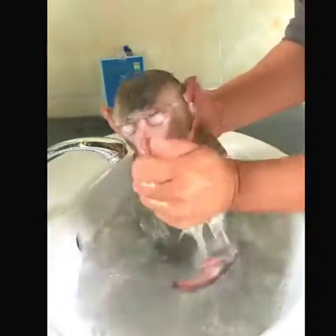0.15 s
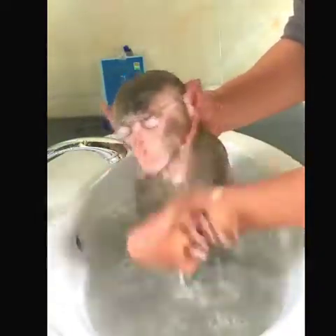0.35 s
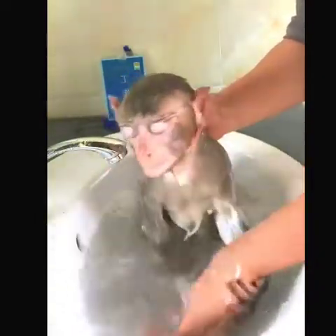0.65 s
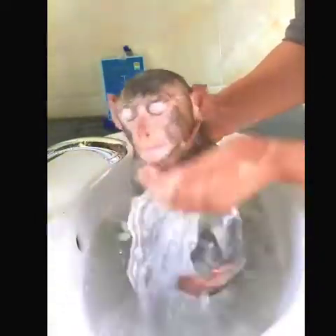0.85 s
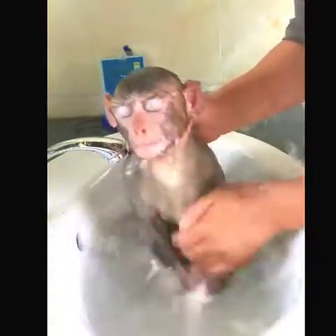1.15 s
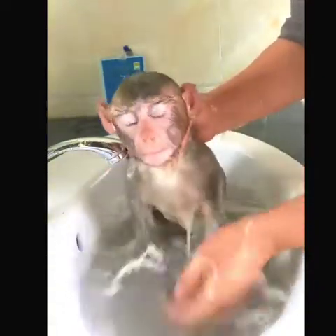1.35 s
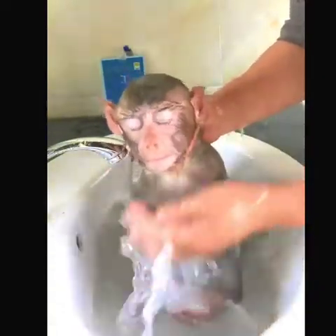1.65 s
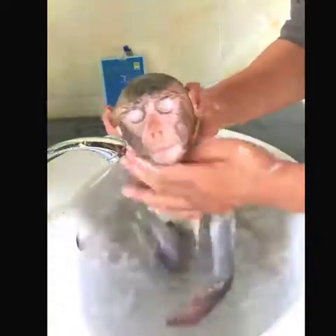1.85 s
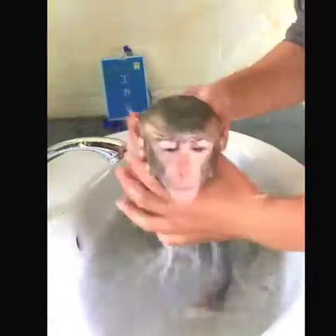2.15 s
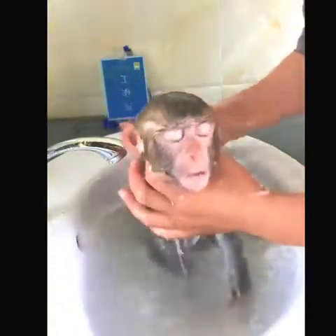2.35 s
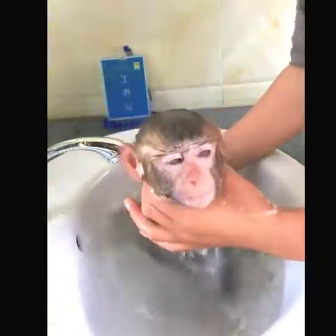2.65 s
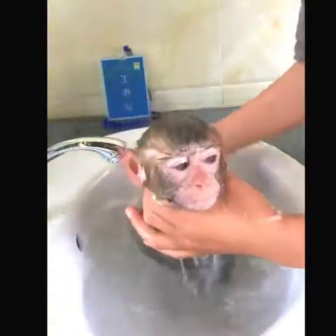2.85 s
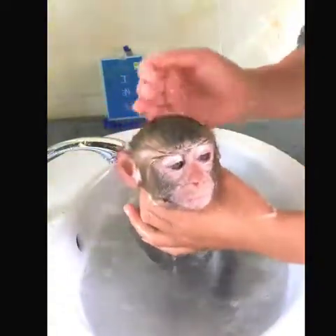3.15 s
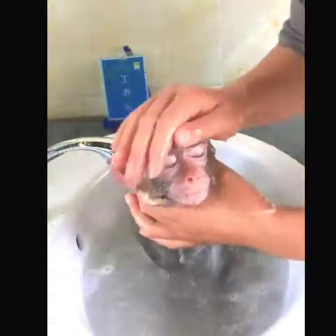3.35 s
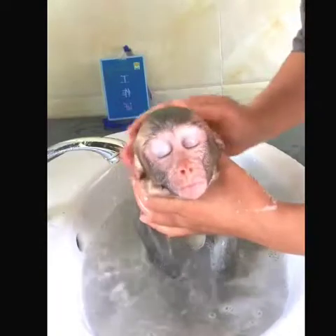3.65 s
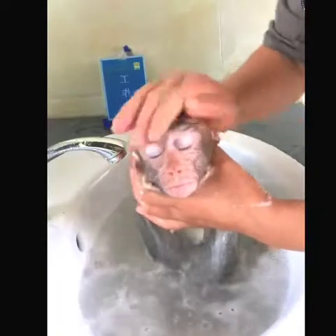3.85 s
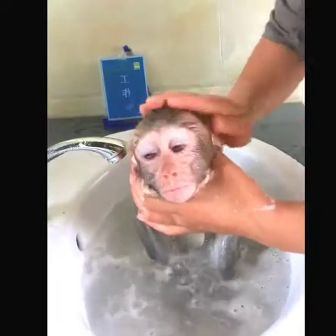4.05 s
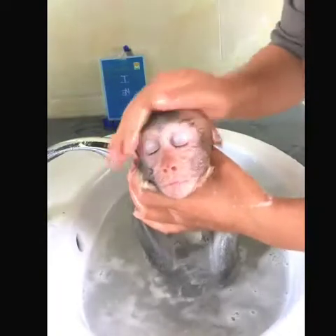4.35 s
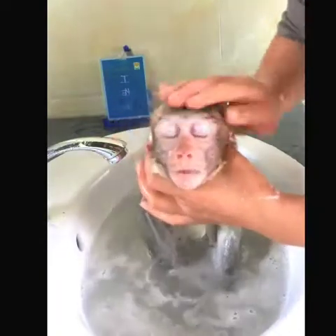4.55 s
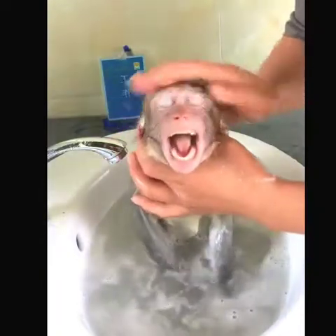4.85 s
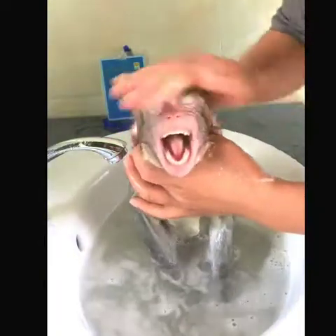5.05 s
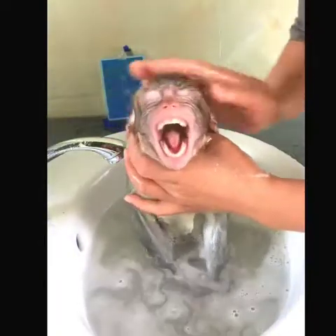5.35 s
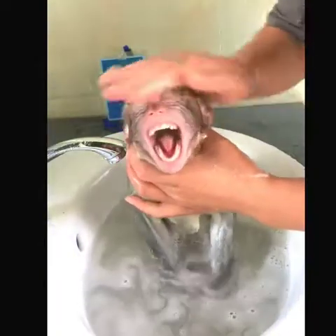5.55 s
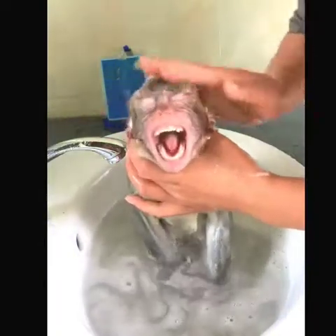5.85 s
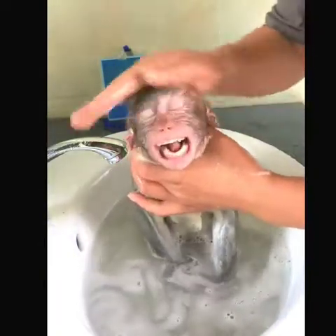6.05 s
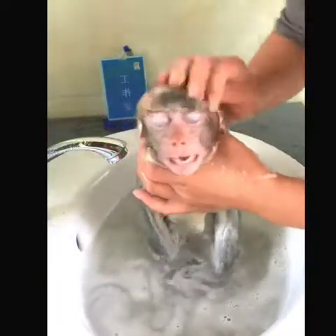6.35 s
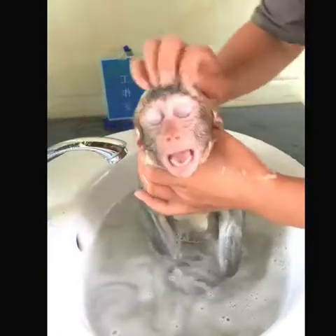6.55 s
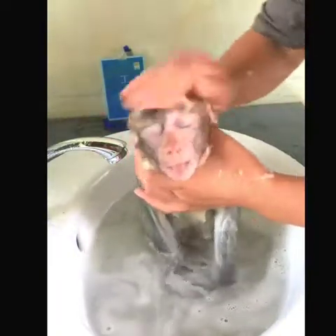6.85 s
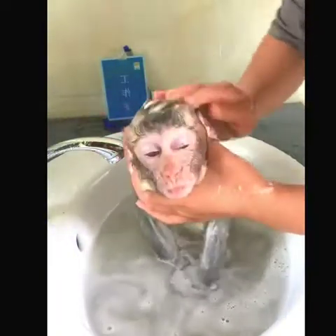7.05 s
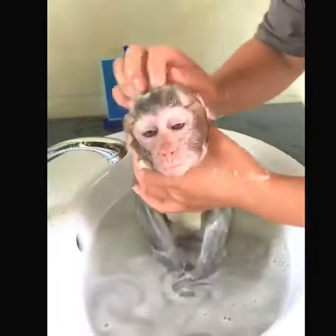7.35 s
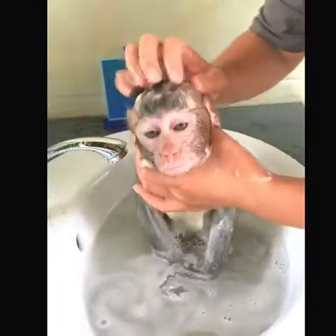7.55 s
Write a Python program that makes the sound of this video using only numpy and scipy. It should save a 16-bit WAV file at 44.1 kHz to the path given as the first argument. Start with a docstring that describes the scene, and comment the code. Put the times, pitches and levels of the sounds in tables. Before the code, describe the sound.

Close, lively splashes and bubbly plops in a washbasin for three seconds, settling into soft squelching strokes on wet fur, with faint drips and hum.

```python
"""Plops and gurgles come first: a hand scoops bath water over a small monkey in a ceramic washbasin.
Air pockets are gliding, dying sines; slaps, patter and spray are noise grains; thuds are low sines.
Later the palm rubs wet fur (bubbles and crackle) and a few drips fall, over a rough hum, a low rumble
and a shifting high hiss. Heard from just in front, in a tiled room, through a two-port microphone."""
import sys
import numpy as np
from scipy import signal
from scipy.fft import rfft, irfft, next_fast_len
from scipy.io import wavfile
from scipy.ndimage import uniform_filter1d

SR = 44100
rng = np.random.default_rng(int(sys.argv[2]) if len(sys.argv) > 2 else 0)


def store_wav(level_fs):
    """Save 16-bit WAV to argv[1]."""
    pcm = np.round(np.clip(np.atleast_2d(level_fs), -1, 1) * 32767)
    wavfile.write(sys.argv[1], SR, pcm.T.astype(np.int16))


N = 340011
T = np.arange(N) / SR

# Levels are relative: each layer is trimmed again where it is mixed.
# air bubbles that stand out: start_s, level_db, pitch_hz, t60_s, rise (share of pitch per s)
BUBBLE_PLOPS = [(0.042, -26, 3370, 0.023, -3), (0.082, -21, 985, 0.062, 5.5), (.091, -13.5, 640, 0.022, 7),
                (.259, -21.5, 1110, 0.022, 2), (0.271, -22.5, 1110, .02, 5), (.306, -21, 5440, .015, 6),
                (0.333, -20, 1194, 0.037, -1), (.343, -12.5, 1180, 0.018, -2),
                (0.386, -13, 436, 0.055, -5.5), (0.39, -16.5, 1295, 0.025, 34),
                (0.395, -21, 1720, 0.022, 1), (.407, -19.5, 1920, 0.029, 4.5), (.5, -22, 1600, .04, -1),
                (0.501, -20, 1110, 0.029, 2), (.554, -12, 968, 0.035, 5), (0.575, -23, 1810, .025, 6),
                (0.594, -23, 1890, 0.023, 14), (0.612, -20, 920, 0.07, 0.5), (0.624, -20.5, 5600, .014, -5),
                (.645, -28, 3300, 0.024, 1), (0.709, -17, 1170, 0.022, 22),
                (.712, -21.5, 1990, 0.027, 12.5), (.716, -18.5, 1584, 0.033, -2),
                (.721, -19.5, 850, 0.064, 10), (.76, -12.5, 1035, .021, 25), (.771, -12.5, 1020, 0.024, 30),
                (.782, -3, 1030, 0.012, 11), (.788, -17.5, 940, 0.056, -5), (.801, -25, 3510, .025, -3),
                (0.826, -17, 1575, 0.038, 3), (.849, -3, 1605, 0.017, 6), (.886, -23, 3100, 0.027, 10),
                (.931, -29, 3350, .03, 0), (.85, -12, 1940, 0.02, 2), (0.981, -7.5, 1590, 0.015, 15),
                (1.018, 1.5, 1430, 0.0039, 44), (1.061, -28, 3950, .025, -8),
                (1.081, -3.5, 994, 0.014, -12), (1.088, -19, 625, 0.02, 3), (1.199, -14.5, 910, 0.022, 10),
                (1.207, -18.5, 1560, 0.016, 5), (1.234, -22.5, 1120, .025, 11), (1.254, -28, 3400, .03, -1),
                (1.276, -7, 1970, 0.0041, 2), (1.276, -21, 3420, 0.011, 7), (1.289, -16.5, 1085, 0.027, 20),
                (1.419, -9.5, 1230, 0.0065, 40), (1.454, -22, 1730, .025, 4),
                (1.461, -16.5, 1060, 0.029, -7), (1.464, -19, 1560, 0.022, 0), (1.478, -18, 431, 0.047, 14),
                (1.481, -23, 1340, 0.028, 8), (1.484, -27, 960, 0.016, 10), (1.494, -15, 710, 0.023, 9),
                (1.565, -23, 6500, .025, -5), (1.584, -22.5, 1530, .025, 5),
                (1.636, -17.5, 1960, 0.009, -2), (1.637, -20.5, 1120, 0.1, 20),
                (1.65, -27, 2980, 0.033, -4), (1.699, -16, 2100, 0.017, 22), (1.714, -19, 1370, 0.021, 27),
                (1.734, -16.5, 996, 0.027, 3), (1.86, -16, 930, 0.014, 2), (1.928, -11, 1260, .011, 5),
                (1.959, -13, 1880, 0.0072, 26), (2.01, -29, 7300, .012, -1), (2.028, -26, 7400, .012, 6),
                (2.214, -23, 8200, .009, 0), (2.232, -21.5, 7000, .007, 4), (2.243, -18.5, 1353, 0.015, 9),
                (2.253, -27, 1300, .025, 1), (2.323, -12.5, 1560, 0.0084, 12),
                (2.347, -17, 1630, 0.013, 42), (2.411, -13.5, 1200, 0.04, -4),
                (2.426, -4.5, 3610, 0.0046, -2), (2.44, -8.5, 1920, 0.021, -6),
                (2.4456, -3.5, 1890, 0.01, 1), (2.451, -4, 1910, 0.013, -4), (2.452, -15.5, 1180, .025, 2),
                (2.453, -8.5, 2400, 0.012, 0), (2.466, -20, 1750, 0.017, -4), (2.469, -14, 3080, 0.01, 10),
                (2.554, -14.5, 2080, 0.009, 20), (2.554, -24.5, 5800, .02, 4),
                (2.643, -19.5, 1600, 0.026, 11), (2.662, -19.5, 1850, 0.033, 0), (2.672, -9, 867, 0.032, 5),
                (2.678, -13.5, 1132, 0.05, 20), (2.686, -23, 2600, .025, -4), (2.692, -22, 1280, .03, 10),
                (2.696, -22, 2600, 0.021, 2), (2.698, -24, 846, 0.034, 5), (2.705, -10, 1656, 0.025, 15),
                (2.719, -24, 1050, 0.032, 11), (2.725, -26, 1800, 0.016, 9), (2.741, -21, 1060, .02, -2),
                (2.811, -17.5, 714, 0.049, 21.5), (2.943, -15, 1260, 0.01, -5), (3.035, -36, 3740, .03, -2),
                (3.246, -27.5, 1640, 0.029, 1.5), (3.291, -30, 1220, 0.059, 1.5),
                (3.301, -24, 1870, .022, 7), (3.315, -25, 1830, .024, 7), (3.366, -29, 1570, 0.037, 0),
                (3.437, -35.5, 1095, 0.12, 1), (3.48, -27.5, 1060, 0.062, 1),
                (3.481, -30.5, 1720, 0.036, 4), (3.51, -37, 1780, .04, 0), (3.546, -32, 1675, 0.041, 3),
                (3.549, -33, 1060, 0.035, 8)]
# small drips once the water has settled: start_s, level_db, pitch_hz
LATE_DRIPS = [(4.136, -41, 1810), (4.274, -38.5, 1800), (4.414, -42, 1820), (4.479, -40, 1760),
              (5.002, -40, 1420), (5.415, -25, 1607), (6.051, -40, 1710), (6.355, -45, 1280),
              (6.639, -35.5, 1990), (6.645, -50, 1390), (6.768, -40, 1650), (6.81, -44, 1380),
              (7.096, -47, 1980), (7.169, -43, 1220), (7.18, -38, 720), (7.409, -43, 1660),
              (7.533, -44, 1720), (7.668, -37, 1450)]
# a short chirp as the neck of each bubble pinches off; its pitch is a ratio to the bubble
NECK_DB, NECK_RATIO, NECK_T60_S = -18, 1.62, 0.013
# each plop sheds further bubbles near its pitch, some higher and some lower, which glide upwards; they last a
# number of cycles
SHED_DB, SHED_WITHIN_S, SHED_OCTAVES, SHED_CYCLES, SHED_RISE = -21, 0.023, 0.4, 20, 0.41
# water slapping on water and fur: start_s, level_db, tilt_db_per_octave
WATER_SLAPS = [(0.09, -7, -1.5), (0.255, 0, -2.5), (0.271, -13, 0), (.344, -10, -10), (.431, 0, 4),
               (.45, 3, 4), (0.476, 2, -1), (0.705, 1, -1), (0.847, -7, 17), (0.93, -3, 9), (0.979, 2, 6.5),
               (1.08, -2, -5.5), (1.275, -12, -3), (1.423, -25, -12), (1.485, -5, 2), (1.565, -10, 4),
               (1.73, -1.5, 0), (1.958, -10.5, -4.5), (2.213, -13, 10), (2.233, -21.5, 0), (2.424, -3.5, 3),
               (2.446, -24, -5), (2.553, -11.5, -6.5), (2.668, -7.5, -10), (2.795, -3, 5), (2.805, -4.5, 5),
               (4.053, -15, 17), (4.073, -16, 12), (5.894, -18, 4), (5.917, -18, 4), (6.615, -21, 9)]
# a dull, heavy slap lasts longer: twice as long for this much less tilt
SLAP_T60_S, SLAP_DOUBLES_PER_DB = 0.015, 15
# runs of linked bubbles as the water folds over: start_s, length_s, level_db, middle_pitch_hz
GURGLE_RUNS = [(.165, 0.022, -42, 1320), (.255, .06, -35, 4200), (.49, .05, -36, 1350),
               (.5, 0.067, -34.5, 520), (.535, 0.06, -29, 1420), (.75, 0.052, -29.5, 1120),
               (.79, .04, -32, 1017), (.88, 0.067, -35, 1340), (1.035, 0.043, -43, 1350),
               (1.075, 0.058, -32, 560), (1.1, 0.029, -38, 950), (1.23, .03, -37, 1210),
               (1.45, 0.048, -23.5, 1240), (1.478, .03, -35, 620), (1.62, 0.066, -34, 1470),
               (1.73, .025, -43, 1180), (1.82, 0.054, -38, 1116), (1.935, .04, -41, 1330),
               (2.375, .018, -31.5, 1770), (2.43, 0.033, -31, 1510), (2.475, 0.052, -35, 1870),
               (2.67, .05, -23.5, 1250), (2.75, .03, -33, 1140), (2.793, 0.032, -26.5, 1405),
               (2.83, 0.052, -41, 855), (2.955, 0.072, -48, 1300), (3.13, 0.048, -53, 1400),
               (3.29, .04, -46, 1580), (3.355, .05, -47, 1480), (3.41, .11, -47, 3950),
               (3.44, 0.073, -41, 1530), (3.54, .04, -49, 1350), (3.61, .06, -49.5, 1390)]
# tiny bubbles squeezed out of the fur: start_s, length_s, level_db, middle_pitch_hz
FUR_SQUISHES = [(3.738, 0.013, -49, 4200), (3.84, 0.033, -51.5, 1710), (4.135, 0.03, -55, 1830),
                (4.48, .02, -56, 1750), (4.531, .012, -47, 3050), (4.623, .012, -50, 3900),
                (4.703, 0.028, -50, 3800), (4.71, 0.018, -51, 1630), (4.885, .012, -54, 1600),
                (4.96, .015, -53, 3720), (5.19, .035, -53, 1450), (5.2, 0.013, -48, 3620),
                (5.39, 0.028, -53, 1510), (5.42, 0.013, -51, 1660), (5.44, 0.022, -62, 1500),
                (5.458, 0.021, -52, 3500), (5.53, 0.056, -54, 1610), (5.628, 0.036, -50, 3450),
                (5.875, 0.052, -54, 3900), (5.93, .07, -59, 1520), (6.05, 0.036, -54, 1650),
                (6.365, 0.029, -49, 1450), (6.45, 0.023, -53, 3100), (6.46, .045, -55, 1550),
                (6.632, 0.019, -49, 1780), (6.636, 0.025, -51, 3500), (6.76, 0.03, -48.5, 2900),
                (6.762, 0.059, -49, 1670), (6.93, .04, -59, 1550), (7.092, .02, -47, 2050),
                (7.13, .06, -56, 1570), (7.2, .14, -57, 850), (7.29, 0.078, -57, 1400),
                (7.4, 0.021, -49, 1390), (7.528, 0.011, -54, 1600), (7.66, .02, -49, 1490)]
# the hand pushes through the water: start_s, length_s, gurgle_db, slosh_db
HAND_PUSHES = [(0, 0.013, -30.5, -33.5), (.08, 0.05, -31, -30.5), (.37, 0.22, -24.5, -37),
               (.7, 0.25, -35, -42), (.97, 0.14, -24.5, -29), (1.2, 0.19, -34.5, -58),
               (1.45, 0.11, -29, -46), (1.58, 0.15, -31, -40.5), (1.85, 0.035, -31.5, -34),
               (2.24, 0.029, -43, -49), (2.33, 0.1, -40, -35.5), (2.42, 0.038, -24, -41),
               (2.662, 0.038, -23.5, -52), (2.79, 0.011, -25.5, -40), (2.86, 0.13, -33.5, -52),
               (3.28, 0.26, -39.5, -66)]
PUSH_ATTACK_S, PUSH_FALL_DB_PER_S = 0.0015, 130
# a handful runs off the fur and lands in the basin: start_s, length_s, patter_db, spray_db
WATER_POURS = [(0, 0.043, -40, -48), (.13, 0.11, -51, -49.5), (.245, 0.014, -29.5, -36.5),
               (.35, 0.064, -55, -42), (.415, 0.062, -36, -51), (.56, 0.21, -38, -45),
               (.81, 0.27, -35.5, -39.5), (1.22, 0.04, -37.5, -44.5), (1.33, 0.21, -40.5, -50.5),
               (1.55, 0.16, -37.5, -40.5), (1.8, 0.14, -46, -53.5), (1.94, 0.014, -38, -51),
               (2.3, 0.017, -42.5, -41), (2.41, 0.11, -36.5, -47.5), (2.67, 0.13, -42, -50.5),
               (2.78, 0.15, -48, -46), (3.31, 0.22, -47, -56), (3.42, 0.044, -44.5, -45.5)]
POUR_ATTACK_S, POUR_FALL_DB_PER_S = 0.0084, 148
# between scoops the water keeps lapping and trickling, until it settles
LAP_DB, LAP_SLOSH_DB, TRICKLE_DB, TRICKLE_SPRAY_DB = -51.5, -53.5, -51, -61
SETTLED_S, SETTLE_DB_PER_S = 3.51, 49
# spectrum of deep slosh: frequency_hz, level_db (per Hz)
SLOSH_SPECTRUM = [(130, 10), (190, 5), (310, -7), (400, 8.5), (480, -4.5), (700, 4.5)]
# spectrum of gurgling and froth: frequency_hz, level_db (per Hz)
GURGLE_SPECTRUM = [(280, -36), (400, -37), (560, -8), (800, -5), (1100, -3.5), (1700, -4.5), (2200, -15.5),
                   (2800, -11)]
# spectrum of drops landing: frequency_hz, level_db (per Hz)
PATTER_SPECTRUM = [(300, -5), (900, 2.5), (2000, 5), (2700, 3.5), (3700, 6), (5000, 2), (6500, 0.5),
                   (9000, -51), (15000, -12)]
# spectrum of the tiniest bubbles: frequency_hz, level_db (per Hz)
TINKLE_SPECTRUM = [(2000, 9.5), (2700, -11), (3600, 1), (5000, -6), (7000, -2), (10000, -0.5)]
# spectrum of fine spray and of lather: frequency_hz, level_db (per Hz)
SPRAY_SPECTRUM = [(3000, -1), (5500, -0.5), (8000, 4), (9400, -0.5), (10200, 1.5), (12000, 0), (13000, -1),
                  (15500, -4)]
# air pockets under the hand and the deep body of the basin:
# start_s, length_s, level_db, pitch_hz, width_hz
AIR_HOLLOWS = [(.4, .18, -30, 85, 60), (0.413, 0.079, -22, 415, 40), (0.485, 0.052, -22.5, 380, 30),
               (1.04, 0.24, -30, 95, 70), (1.082, 0.067, -28, 400, 70), (1.488, 0.056, -29, 560, 120),
               (2.0, .3, -33, 135, 50), (2.37, .27, -32.5, 130, 40), (2.38, 0.18, -34, 197, 40),
               (2.448, 0.085, -27, 683, 50), (2.678, 0.042, -30, 1250, 160), (2.737, 0.17, -33, 900, 100)]
# soft knocks of hand and water on the basin: start_s, level_db, pitch_hz, t60_s
BASIN_THUDS = [(0.083, -18, 93, 0.077), (0.369, -15, 61.5, 0.13), (0.431, -25, 126, 0.17),
               (0.489, -22.5, 64.6, 0.38), (0.545, -19.5, 93, 0.14), (0.649, -20.5, 60, 0.16),
               (0.99, -8, 91.5, 0.072), (1.029, -23, 64.3, 0.82), (1.084, -27, 113, 0.47),
               (1.13, -44, 149, 0.36), (1.19, -30, 99.5, 0.58), (2.344, -14, 111, 0.12),
               (2.452, -19, 123, 0.095), (2.509, -23.5, 122, 0.24)]
# the palm strokes the wet head: start_s, length_s, squelch_db, fur_db, lather_db
PALM_STROKES = [(3.68, .2, -66, -59.5, -67.5), (4.073, 0.22, -63, -59.5, -61),
                (4.44, 0.15, -75, -58.5, -61), (4.6, 0.12, -60, -56.5, -53), (4.87, 0.22, -63, -59.5, -59),
                (5.41, 0.2, -58.5, -59, -67), (5.6, 0.083, -70, -57, -61), (5.73, 0.11, -58, -67, -66),
                (5.85, 0.23, -60, -56, -60), (6.19, 0.045, -56, -62, -67), (6.35, 0.074, -57, -59, -74),
                (6.44, 0.07, -74, -56, -68), (6.6, 0.094, -58, -54, -53), (6.72, 0.11, -57, -54, -50),
                (6.86, 0.35, -58, -61, -68), (7.08, .2, -52.5, -60, -57), (7.38, 0.14, -56.5, -64, -58),
                (7.6, 0.078, -57, -61, -48.5)]
STROKE_ATTACK_S, STROKE_FALL_DB_PER_S = 0.0085, 172
RESTING_DB, RESTING_LATHER_DB = -61.5, -81   # the holding hand never lies quite still
# spectrum of water pressed under the palm: frequency_hz, level_db (per Hz)
SQUELCH_SPECTRUM = [(400, 1.5), (700, -5.5), (1000, -5.5), (1250, 0), (1800, -3), (2200, -4.5), (2800, -36)]
# spectrum of crackling wet fur: frequency_hz, level_db (per Hz)
FUR_SPECTRUM = [(1000, 20), (2000, 20.5), (3000, 22), (4200, 26.5), (6000, -32), (10000, -26), (15000, -56)]
# how much the bowl's scatter differs between left and right: frequency_hz, side_db
BOWL_SIDE = [(300, -28), (550, -4), (1100, -18), (1900, -4), (2700, -3), (3700, -3), (4500, -5.5),
             (5400, -8), (6500, -17), (9000, 2.5), (10800, -2.5), (12700, -10), (15000, -4)]
BOWL_T60_S, BOWL_ECHOES_PER_S = 0.064, 1300
PLACES_PER_S = 9   # the splashing keeps moving round the bowl
ROOM_T60_S, ROOM_DB = 0.25, -7
# level of the hum: time_s, level_db
HUM_CURVE = [(0, -8), (1.4, 0.5), (2.4, 0.5), (2.7, -5), (4.35, -5), (4.55, -22), (5.35, -24), (5.7, -7.5),
             (6.2, -7.5), (6.9, 2.5), (7.7, -3.5)]
HUM_HZ, HUM_DB, HUM_MURK_KNOTS_PER_S, HUM_ROUGH = 271.6, -51, 45, 0.53
# the high hiss swells in two bands: time_s, lower_db, upper_db
HISS_CURVE = [(0, -46.5, -40.5), (1.4, -55, -39.5), (2.15, -52, -40.5), (3.1, -46, -40.5),
              (3.6, -44, -40.5), (4.22, -44.5, -39.5), (4.45, -54, -38), (4.9, -50, -39), (5.4, -49, -38.5),
              (5.65, -47, -38.5), (6.2, -48.5, -39.5), (6.7, -49.5, -39), (7.3, -46.5, -40.5),
              (7.55, -45.5, -40.5), (7.71, -50.5, -40)]
# spectrum of the lower hiss: frequency_hz, level_db (per Hz)
LOWER_HISS_SPECTRUM = [(2800, -19), (3600, -3.5), (4300, -5), (5000, -1), (5500, 1.5), (6000, 5.5),
                       (6600, 8), (7400, -4)]
# likeness of left and right in the lower hiss: frequency_hz, likeness (0-1)
LOWER_HISS_LIKENESS = [(4200, 0), (4650, 1), (5200, 1), (5600, 0.5), (6600, 0.9)]
# spectrum of the upper hiss: frequency_hz, level_db (per Hz)
UPPER_HISS_SPECTRUM = [(5600, -30), (6500, -11), (7300, -2.5), (8300, 0), (9000, -3.5), (9450, -6),
                       (9800, -19), (11000, -22.5)]
# spectrum of faint air noise: frequency_hz, level_db (per Hz)
AIR_SPECTRUM = [(400, -17), (800, 15), (1500, 26), (2700, 17), (4000, -22), (6000, -16), (10000, -5),
                (13000, 0), (15500, -7)]
# spectrum of the low rumble: frequency_hz, level_db (per Hz)
RUMBLE_SPECTRUM = [(18, -2.5), (28, 2.5), (55, -1), (80, -2.5), (125, -9), (170, -11.5), (280, -19.5),
                   (350, -27), (600, -39), (1000, -78)]
HISS_DB, RUMBLE_DB, AIR_DB = 1, -40, -64
# phase by which the left port leads the right (a lag where negative): frequency_hz, lead_rad
LEFT_PORT_PHASE = [(300, 0), (550, -.8), (1200, -.3), (2000, -.6), (2750, -1.3), (3300, -.1), (4250, -.3),
                   (4750, -2.8), (5150, -3.4), (5650, -6.2), (7100, -6.4), (9500, -8), (9900, -6.4),
                   (10500, -6.5), (11200, -9.4), (11800, -12.5), (13800, -12.6), (15000, -13.8)]
CUTOFF_HZ = 15450


def plops(plop_db, drip_db, drip_t60):
    """Bubbles under each scoop ring, chirp as they pinch off and shed others near their pitch; drips ring late."""
    out = np.zeros(N)
    chance = rng.random((len(BUBBLE_PLOPS), 2, 3))   # two shed bubbles each
    for (s, db, hz, t60, rise), shed in zip(BUBBLE_PLOPS, chance):
        add(out, s, from_db(db + plop_db) * bubble(hz, t60, rise))
        add(out, s, from_db(db + NECK_DB) * bubble(hz * NECK_RATIO, NECK_T60_S, rise=0))
        for wait, size, glide in shed:
            small_hz = hz * 2 ** (SHED_OCTAVES * (2 * size - 1))
            life = SHED_CYCLES / small_hz
            small = bubble(small_hz, life, SHED_RISE * glide / life)
            add(out, s + SHED_WITHIN_S * wait, from_db(db + SHED_DB) * small)
    for s, db, hz in LATE_DRIPS:
        add(out, s, from_db(db + drip_db) * bubble(hz, drip_t60, rise=1.7))
    return out


def slaps(level_db, attack_s, low_hz, alike, grain_db):
    """A sheet of water breaks into drops as it lands: a short, grainy burst."""
    out, t = np.zeros((2, N)), T[:8192]
    hz = np.arange(len(t) // 2 + 1) * SR / len(t)
    for s, db, tilt_db in WATER_SLAPS:
        tilt = from_db(tilt_db * np.log2((hz + 300) / 5000))
        shape = tilt * hz ** 2 / (hz ** 2 + low_hz ** 2) / (1 + (hz / 9500) ** 2)
        grains = from_db(grain_db * np.repeat(rng.uniform(-1, 1, len(t) // 16), 16))
        rough = grains * widen(*rng.standard_normal((2, len(t))), alike)
        noise = rms_one(irfft(rfft(rough) * shape))
        t60 = SLAP_T60_S * 2 ** (max(-tilt_db, 0) / SLAP_DOUBLES_PER_DB)
        add(out, s, from_db(db + level_db - 60 * t / t60) * (1 - np.exp(-t / attack_s)) * noise)
    return out


def clusters(rows, per_s, octaves, cycles, rise, level_db, spread_db):
    """Bubbles break off one after another round a middle pitch; each may ring on into the next."""
    out = np.zeros(N)
    for s, length, db, hz in rows:
        count = int(3 + per_s * length)
        run = np.zeros(16384)
        for k, (wait, size, strength, life) in enumerate(rng.random((count, 4))):
            pitch = hz * 2 ** (octaves * (2 * size - 1))
            t60 = cycles * (.5 + life) / pitch
            ring = from_db(spread_db * strength) * bubble(pitch, t60, rise * life / t60)
            i = int(length * (k + wait) / count * SR)
            run[i:i + len(ring)] += ring[:len(run) - i]
        # even out the power over the run and a share of the last ring
        even = np.sqrt((length + cycles / hz / 7) * SR / np.sum(run ** 2))
        add(out, s, from_db(db + level_db) * run * even)
    return out


def stirred_water(slosh_db, gurgle_db, froth_db, patter_db, tinkle_db, spray_db):
    """Water off hand and fur: slosh, gurgles, froth below; patter, tiny bubbles, spray above."""
    unrest = from_db(-SETTLE_DB_PER_S * np.maximum(T - SETTLED_S, 0))
    lapping = from_db([[LAP_DB], [LAP_SLOSH_DB]]) * unrest
    trickling = from_db([[TRICKLE_DB], [TRICKLE_SPRAY_DB]]) * unrest
    gurgle, slosh = np.hypot(gestures(HAND_PUSHES, PUSH_ATTACK_S, PUSH_FALL_DB_PER_S), lapping)
    patter, spray = np.hypot(gestures(WATER_POURS, POUR_ATTACK_S, POUR_FALL_DB_PER_S), trickling)
    swirl = colour(droplets(per_s=150, spread_db=-4.0, clump_db=8.5, wash=1.0), SLOSH_SPECTRUM)
    cloud = bubble_cloud(GURGLE_SPECTRUM, cycles=32, spread_db=13, rise=.3, count=5000)
    froth = colour(droplets(per_s=590, spread_db=-0.5, clump_db=5.0, wash=0.47), GURGLE_SPECTRUM)
    tinkle = bubble_cloud(TINKLE_SPECTRUM, cycles=190, spread_db=29, rise=0.17, count=3000)
    drops = wide_droplets(alike=0.77, per_s=800, spread_db=5, clump_db=2.0, wash=.75)
    mist = wide_droplets(alike=0.99, per_s=2200, spread_db=6.0, clump_db=0.5, wash=0.7)
    low = from_db(slosh_db) * slosh * swirl
    low = low + gurgle * (from_db(gurgle_db) * cloud + from_db(froth_db) * froth)
    high = patter * (from_db(patter_db) * colour(drops, PATTER_SPECTRUM) + from_db(tinkle_db) * tinkle)
    return low + high + from_db(spray_db) * spray * colour(mist, SPRAY_SPECTRUM)


def hollows(level_db):
    """Churning water, as noise, drives a resonance at each hollow's own pitch."""
    out = np.zeros(N)
    for s, length, db, hz, width in AIR_HOLLOWS:
        r = np.exp(-np.pi * width / SR)
        t = T[:int(length * SR)]
        poles = [1, -2 * r * np.cos(2 * np.pi * hz / SR), r * r]
        ring = signal.lfilter([1], poles, rng.standard_normal(len(t)))
        swell = np.sqrt(np.abs(np.sin(np.pi * t / t[-1])))
        add(out, s, from_db(db + level_db) * swell * rms_one(ring))
    return out


def thuds(level_db):
    """The filled basin answers hand and water with a low, damped swing."""
    out = np.zeros(N)
    for s, db, hz, t60 in BASIN_THUDS:
        add(out, s, from_db(db + level_db) * bubble(hz, t60, rise=0))
    return out


def rubbing(squelch_db, fur_db, lather_db, uneven_db):
    """The palm presses soapy water through the fur: small bubbles, crackle and fizz."""
    fade_in = np.clip(T - SETTLED_S + 1, 0, 1)
    resting = from_db([[RESTING_DB], [RESTING_DB], [RESTING_LATHER_DB]]) * fade_in
    strokes = gestures(PALM_STROKES, STROKE_ATTACK_S, STROKE_FALL_DB_PER_S)
    squelch, fur, lather = np.hypot(strokes, resting)
    cloud = bubble_cloud(SQUELCH_SPECTRUM, cycles=26, spread_db=9, rise=.2, count=4000)
    cloud = cloud * from_db(uneven_db * drift(18))
    crackle = wide_droplets(alike=0.05, per_s=700, spread_db=3, clump_db=2.2, wash=.9)
    fizz = wide_droplets(alike=0.19, per_s=2300, spread_db=13, clump_db=7.5, wash=0.87)
    out = from_db(squelch_db) * squelch * cloud
    out = out + from_db(fur_db) * fur * colour(crackle, FUR_SPECTRUM)
    return out + from_db(lather_db) * lather * colour(fizz, SPRAY_SPECTRUM)


def basin_and_room(x, rim_db, room_alike, treble_loss, count):
    """The sound passes from place to place in the bowl, and each place colours it differently."""
    out = np.zeros((2, N))
    for k in range(count):
        away = np.abs((T * PLACES_PER_S - k) % count - count / 2)
        here = np.sqrt(np.clip(1 - away, 0, 1))
        echoes = reflections(rim_db, room_alike, treble_loss)
        out += signal.oaconvolve(x * here, echoes, axes=1)[:, :N]
    return out


def reflections(rim_db, room_alike, treble_loss):
    """One place: the bowl scatters quick echoes, and the tiles ring on, shorter in the treble."""
    t = T[:16384]
    hz = np.arange(len(t) // 2 + 1) * SR / len(t)
    noise = widen(*rng.standard_normal((2, len(t))), room_alike)
    dull = signal.sosfilt(signal.butter(2, 3500, fs=SR, output="sos"), noise)
    bright = noise - dull
    tail = dull * from_db(-60 * t / ROOM_T60_S) + bright * from_db(-60 * t * treble_loss / ROOM_T60_S)
    tail = tail * (t > .005)
    hits = rng.random((2, len(t))) < BOWL_ECHOES_PER_S / SR
    echoes = rng.choice([-1, 1], (2, len(t))) * hits
    mid, side = [rms_one(e * from_db(-60 * t / BOWL_T60_S) * (t > .001)) for e in echoes]
    # the middle of the scatter keeps mostly short waves
    mid = signal.sosfilt(signal.butter(2, 2000, "high", fs=SR, output="sos"), mid)
    side = irfft(rfft(side) * from_db(at_hz(BOWL_SIDE, hz))) * (t < BOWL_T60_S)
    both = from_db(ROOM_DB) * rms_one(tail) + from_db(rim_db) * mid + side * np.array([[1], [-1]])
    return both / np.sqrt(len(t))


def hum():
    """A faint, rough hum: a wavering tone within a narrow band of noise."""
    level, = in_time(HUM_CURVE)
    phase = 2 * np.pi * np.cumsum(HUM_HZ + 3 * drift(25)) / SR
    murk = drift(HUM_MURK_KNOTS_PER_S) * np.cos(phase) + drift(HUM_MURK_KNOTS_PER_S) * np.sin(phase)
    return from_db(HUM_DB) * level * rms_one(np.sin(phase) + HUM_ROUGH * murk)


def background(hiss_alike, flutter_db):
    """Shaped noise: a high hiss in two bands, faint air noise and a low rumble."""
    lower, upper = in_time(HISS_CURVE)
    size = next_fast_len(N)
    alike = at_hz(LOWER_HISS_LIKENESS, np.arange(size // 2 + 1) * SR / size)
    low_noise = irfft(widen(*rfft(rng.standard_normal((2, size))), alike), size)[:, :N]
    high_noise = widen(*rng.standard_normal((2, N)), hiss_alike)
    hiss = lower * colour(low_noise, LOWER_HISS_SPECTRUM) + upper * colour(high_noise, UPPER_HISS_SPECTRUM)
    hiss = hiss * from_db(flutter_db * drift(25))
    air = colour(widen(*rng.standard_normal((2, N)), alike=0.077), AIR_SPECTRUM)
    # long waves are the same at both ports; mainly the top of the rumble differs
    apart = colour(rng.standard_normal(N), [(40, -58), (130, 7.0), (300, 6.5), (600, 2.5)])
    apart = apart * np.array([[1], [-1]])
    rumble = colour(rng.standard_normal(N), RUMBLE_SPECTRUM) + from_db(-17.5) * apart
    return from_db(HISS_DB) * hiss + from_db(AIR_DB) * air + from_db(RUMBLE_DB) * rumble


def microphones(x):
    """The ports agree in the bass; above it the left port's resonances turn its phase."""
    size = next_fast_len(N + 4096)
    hz = np.arange(size // 2 + 1) * SR / size
    turn = np.exp(1j * at_hz(LEFT_PORT_PHASE, hz))
    left = irfft(rfft(x[0], size) * turn, size)[:N]
    return np.array([left, x[1]])


def bubble(hz, t60, rise, swell_cycles=0.62):
    """A pocket of air swells within a cycle or so and rings down; its pitch glides by rise per s."""
    t = T[:int(max(t60, .002) * SR)]
    ring = np.sin(2 * np.pi * hz * (t + rise * t * t / 2))
    return ring * from_db(-60 * t / t60) * (1 - np.exp(-hz * t / swell_cycles))


def bubble_cloud(spectrum, cycles, spread_db, rise, count):
    """Many small bubbles of all sizes, scattered over the basin, with the level evened out."""
    out = np.zeros((2, N))
    when, size, strength, life, place, sign = rng.random((count, 6)).T
    hz = spectrum[0][0] * (spectrum[-1][0] / spectrum[0][0]) ** size
    t60 = cycles * (.5 + life) / hz
    gain = np.sign(sign - .5) * hz * from_db(at_hz(spectrum, hz) + spread_db * strength)
    for k in range(count):
        pan = from_db(np.array([[4], [-4]]) * (place[k] - .5))
        add(out, when[k] * N / SR, gain[k] * pan * bubble(hz[k], t60[k], rise * life[k] / t60[k]))
    power = uniform_filter1d(np.mean(rms_one(out) ** 2, axis=0), size=1500)
    return rms_one(out) / np.sqrt(power + 0.06)


def droplets(per_s, spread_db, clump_db, wash):
    """Tiny impacts of uneven size that come in clumps, over a wash of finer ones."""
    sizes = from_db(spread_db * np.minimum(rng.exponential(1, N), 4)) * rng.choice([-1, 1], N)
    clicks = rms_one(sizes * (rng.random(N) < per_s / SR))
    return (clicks + wash * rng.standard_normal(N)) * from_db(clump_db * drift(110))


def wide_droplets(alike, **settings):
    """Two independent sets of droplets spread over left and right."""
    return widen(droplets(**settings), droplets(**settings), alike)


def gesture(start, length, attack_s, fall_db_per_s):
    """A movement swells, holds until its length is over and dies away."""
    fall = from_db(-fall_db_per_s * np.clip(T - start - length, 0, 3))
    return np.clip((T - start) / attack_s, 0, 1) * fall


def gestures(rows, attack_s, fall_db_per_s):
    """Overlapping movements add in power; one gain per sample for each level column."""
    power = 0
    for s, length, *levels in rows:
        power = power + (from_db(levels)[:, None] * gesture(s, length, attack_s, fall_db_per_s)) ** 2
    return np.sqrt(power)


def from_db(db):
    """Decibels to gain."""
    return 10 ** (np.asarray(db) / 20)


def rms_one(x):
    """Scale to rms 1."""
    return x / np.sqrt(np.mean(x ** 2) + 1e-20)


def in_time(rows):
    """Each level column of a curve as a gain per sample."""
    s, *columns = np.transpose(rows)
    return [from_db(np.interp(T, s, c)) for c in columns]


def at_hz(points, hz):
    """Read a curve on a log-frequency axis."""
    f, values = np.transpose(points)
    return np.interp(np.log(hz + 1e-9), np.log(f), values)


def colour(x, spectrum):
    """Give a signal a spectrum that falls away beyond its ends; rms 1."""
    size = next_fast_len(N)
    hz = np.arange(size // 2 + 1) * SR / size
    skirts = np.minimum(hz / spectrum[0][0], 1) ** 2 * np.minimum(spectrum[-1][0] / (hz + 1), 1) ** 2
    return rms_one(irfft(rfft(x, size) * from_db(at_hz(spectrum, hz)) * skirts, size)[..., :N])


def drift(knots_per_s):
    """Slow random wander of rms 1, straight between its knots."""
    knots = rng.standard_normal(4000)
    return rms_one(np.interp(T * knots_per_s, np.arange(len(knots)), knots))


def widen(mid, side, alike):
    """Left and right with a given likeness."""
    opposed = side * np.array([[1], [-1]])
    return (np.sqrt(1 + alike) * mid + np.sqrt(1 - alike) * opposed) / np.sqrt(2)


def add(out, s, sound):
    """Mix a sound in at a time."""
    i = int(np.clip(s * SR, 0, N - 1))
    out[..., i:i + sound.shape[-1]] += sound[..., :N - i]


def scene():
    """All the water sounds in the basin, heard from just in front of it, and the background."""
    water = plops(plop_db=2.0, drip_db=-1.0, drip_t60=0.032)
    water = water + slaps(level_db=-6.5, attack_s=0.0023, low_hz=1880, alike=1.0, grain_db=9)
    water = water + clusters(GURGLE_RUNS, per_s=150, octaves=0.505, cycles=42, rise=0.23,
                             level_db=-5.5, spread_db=13)
    water = water + clusters(FUR_SQUISHES, per_s=180, octaves=0.43, cycles=22, rise=.15,
                             level_db=-2.5, spread_db=1)
    water = water + stirred_water(slosh_db=-3.0, gurgle_db=-9.5, froth_db=-13.0,
                                  patter_db=0.5, tinkle_db=-1.0, spray_db=6.0)
    water = water + hollows(level_db=-10.5)
    water = water + rubbing(squelch_db=-2.0, fur_db=3.0, lather_db=1.5, uneven_db=3.0)
    space = basin_and_room(water, rim_db=-5.5, room_alike=0.93, treble_loss=1.22, count=8)
    return water + space + thuds(level_db=-1.5) + hum() + background(hiss_alike=0.78, flutter_db=0.85)


def record(dry):
    """Two small ports pick the sound up; the top is cut steeply."""
    steep = signal.ellip(10, .1, 90, CUTOFF_HZ, fs=SR, output="sos")
    return signal.sosfilt(steep, microphones(dry))


dry = scene()
out = record(dry)
store_wav(out)
```